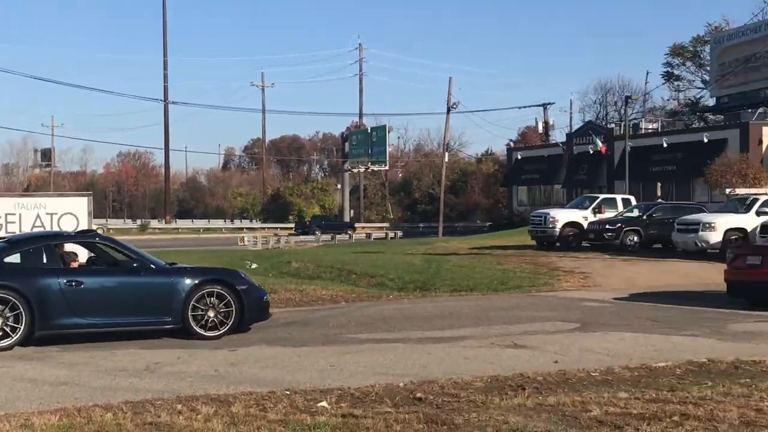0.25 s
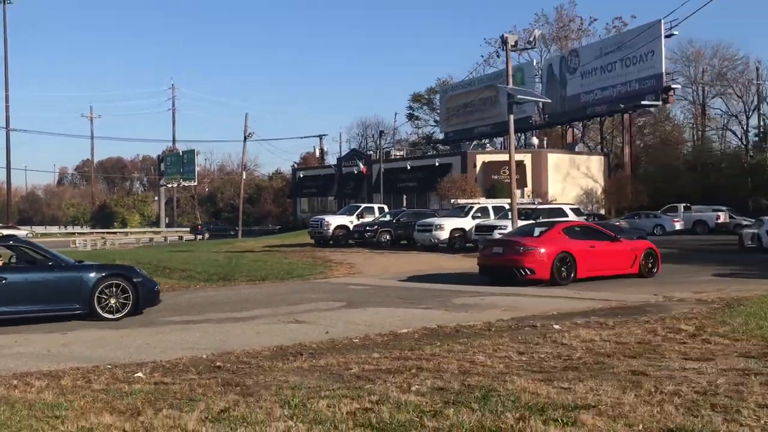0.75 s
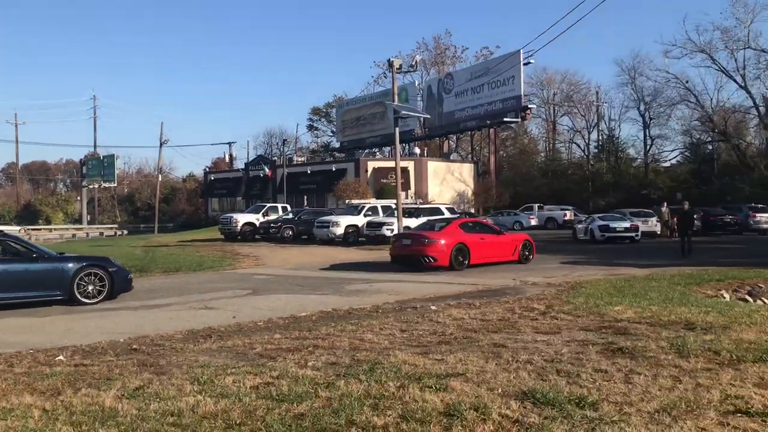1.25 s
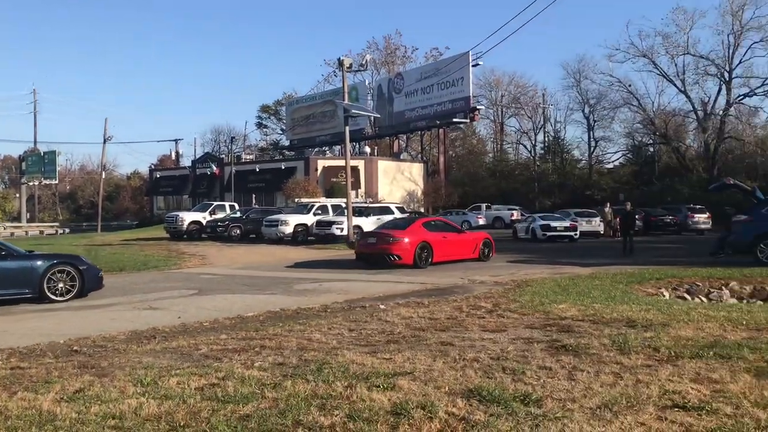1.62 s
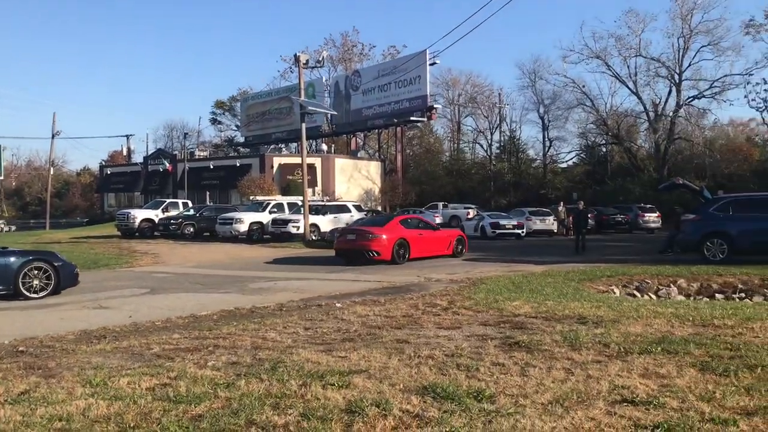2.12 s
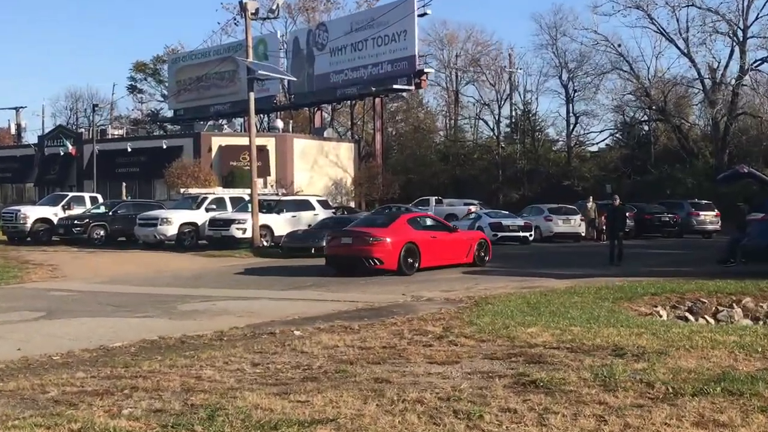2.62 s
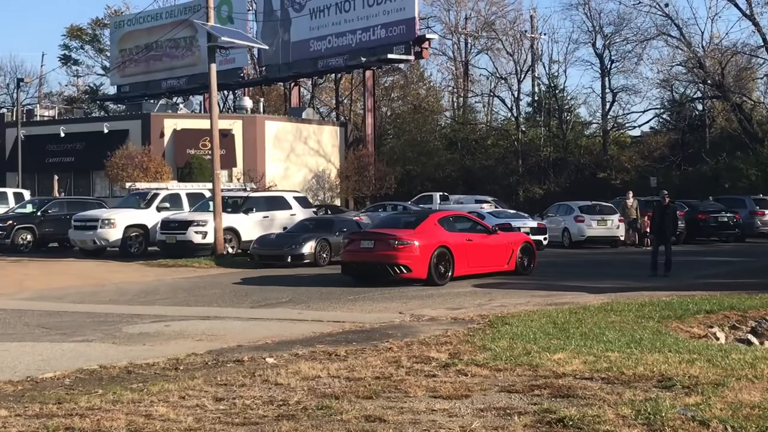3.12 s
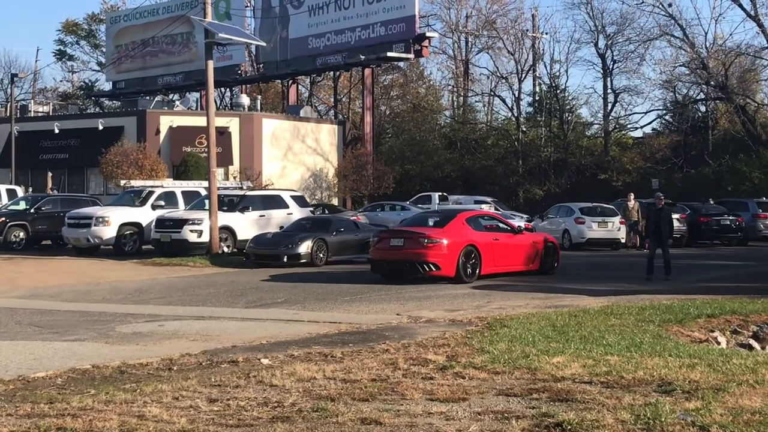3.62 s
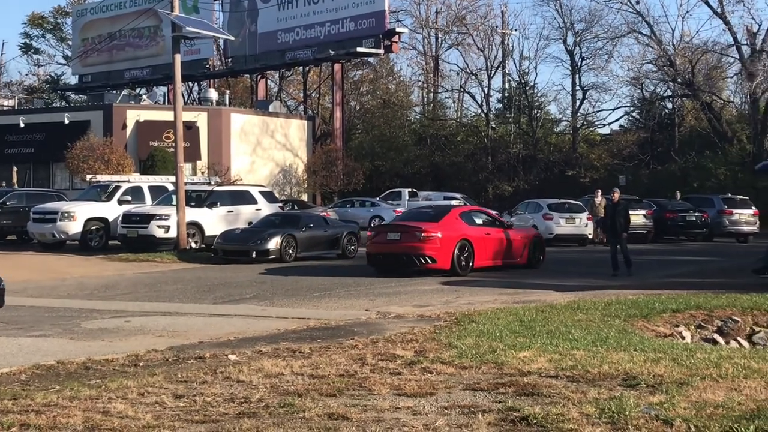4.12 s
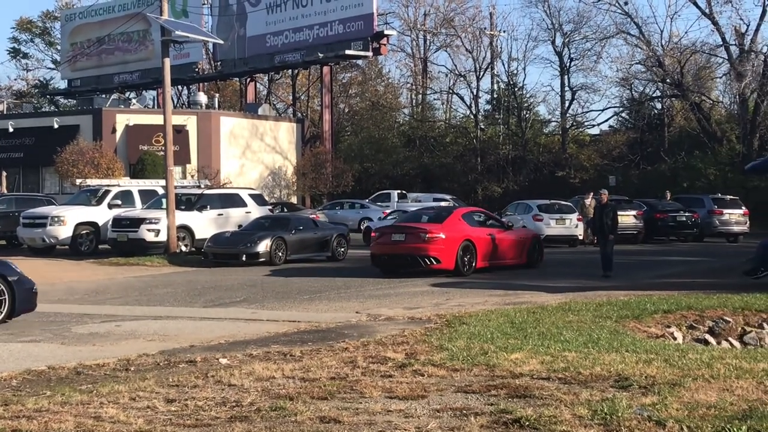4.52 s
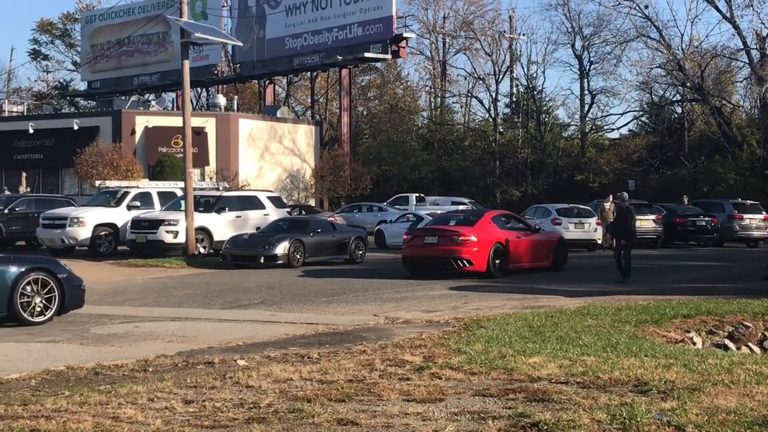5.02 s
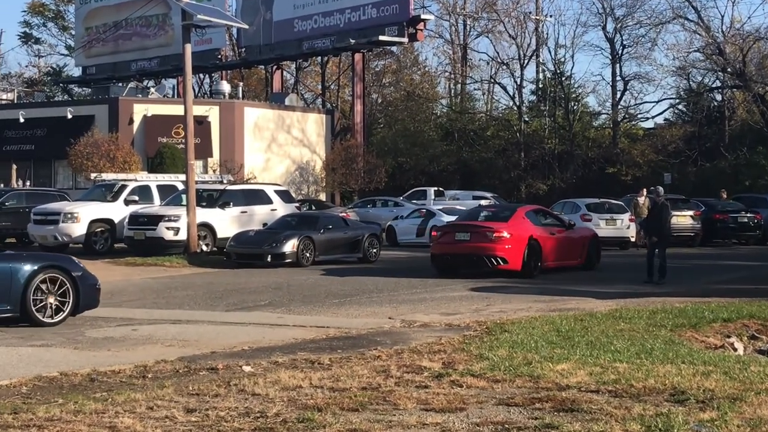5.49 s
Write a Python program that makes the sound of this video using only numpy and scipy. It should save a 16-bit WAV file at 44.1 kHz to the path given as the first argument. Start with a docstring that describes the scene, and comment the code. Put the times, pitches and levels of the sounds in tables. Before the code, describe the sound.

Several sports cars creep along with bassy, throbbing exhausts. Tread hiss dies quickly, one engine pulls harder and burbles, then the nearer one blips with a hum and thin metallic sizzle. Idling resumes with faint injector ticks, grit snaps and tiny squeaks, before another swell at the end. Open air by the grass, distant traffic, single-channel handheld sound with slightly thin sub-bass.

```python
"""A V8 coupe rolls away at little more than idle: firing pulses ring its tailpipes under a sine drone.
A nearer flat six idles lumpily behind it, with noise-burst injector ticks and an engine bay sizzle.
An exhaust booms under throttle, its third harmonic swelling as the pitch nears a muffler resonance.
Filtered noise makes nearby tyres, highway roar, and belt and fan whir; grit snaps and faint squeaks sound.
The sports cars creep along a road into a parking lot, heard from the grass verge."""
import sys
import numpy as np
from scipy import signal
from scipy.fft import rfft, irfft
from scipy.io import wavfile
from scipy.ndimage import uniform_filter1d

SR = 44100
rng = np.random.default_rng(int(sys.argv[2]) if len(sys.argv) > 2 else 0)


def digitize_waveform(pressure):
    """Quantize a signal to 16-bit integers and store it at the path in sys.argv[1].

    Rows of a 2-D input are taken as channels; values are limited to [-1, 1].
    """
    field = np.atleast_2d(pressure).T
    bounded = np.clip(field, -1, 1)
    quanta = np.round(bounded * 32767).astype(np.int16)
    wavfile.write(sys.argv[1], SR, quanta)


N = 253575
TIME = np.arange(N) / SR  # s

# V8 speed: (time [s], rate [firings/s])
V8_SPEED = [(0, 46), (1.2, 45.9), (1.55, 47.3), (1.69, 58), (2, 62.5), (2.3, 61.2), (2.6, 58.3), (3.05, 51),
            (3.7, 47.5), (4.25, 47.4), (4.6, 45.8), (5.53, 46.3), (5.72, 55)]
# V8 firing strengths over one engine cycle, scaled by the lope: (relative strength [dB])
V8_CYLINDERS = [2, -3, -3, -22.5, -2, 9.5, 2, -22.5]
# V8 tailpipe resonances: (frequency [Hz], width [Hz], relative gain [dB])
V8_PIPE = [(157, 72, -11), (236.6, 13.4, 1), (288.8, 16.4, 2), (290, 75, -9.5)]
# V8 exhaust resonances swelling one harmonic: (centre [Hz], width [Hz], top level [dB rms])
V8_LOW_RESONANCE = (58.87, 14.9, -25.5)
V8_HIGH_RESONANCE = (97.5, 8.5, -32.5)
# V8 burble at its lowest speed, slowly sinking, then recovering: (time [s], level [dB])
V8_BURBLE = [(0, -40.5), (1.5, -42), (3.2, -42.5), (4.35, -45.5), (5.75, -41.5)]
# V8 tailpipes singing briefly on the sixth harmonic: (start [s], end [s], level [dB])
V8_RING = [(4.3, 4.72, -45)]
# Weak echoes from parked cars and a wall: (delay [s], gain [dB])
CAR_PARK_ECHOES = [(.019, -11), (.047, -12.5), (.083, -12.5)]

# Flat six speed: (time [s], rate [firings/s])
SIX_SPEED = [(0, 46), (1.7, 45), (2.2, 42.6), (2.5, 44), (2.68, 55.5), (3.25, 43.4), (4.6, 47.2), (5.3, 42),
             (5.75, 44)]
# Flat six firing strengths over one engine cycle: (relative strength [dB])
SIX_CYLINDERS = [9, 6.5, 9.5, 6, 7.5, -19]
# Flat six tailpipe resonances: (frequency [Hz], width [Hz], relative gain [dB])
SIX_PIPE = [(41.7, 12.3, -5.5), (59.4, 17.5, 1.5), (86, 24, 0), (150.3, 37.2, -7), (260, 70, -15.5)]
# Flat six exhaust rumble: (time [s], level [dB])
SIX_RUMBLE = [(0, -31), (1.3, -32), (1.7, -40), (2.3, -33.5), (3.2, -32), (4.2, -32), (4.7, -33.5),
              (5.3, -33.5)]
# Flat six hum swelling after its blip and again near the end, added to its idle:
# (start [s], end [s], level [dB])
HUM_SWELLS = [(2.82, 3.25, -29.5), (5.3, 5.4, -34.5)]
# Engine bay sizzle surging after the flat six's blip and later, added to its idle:
# (start [s], end [s], level [dB])
SIZZLE_SURGES = [(2.9, 3.52, -59.5), (4.1, 4.75, -71), (5.7, 5.75, -62.5)]
# Engine bay sizzle spectrum: (frequency [Hz], relative density [dB/Hz])
SIZZLE_SPECTRUM = [(3200, -17), (3800, -1), (4100, -24), (4950, -30), (5250, 1), (5650, -20.5), (7100, -13),
                   (7700, -15), (8400, -8.5), (9100, -0.5), (9600, -19.5), (12000, -20), (15500, -26)]
# Injector tick strengths over one engine cycle: (relative strength [dB])
INJECTOR_STRENGTHS = [10.5, -14, 10, -11, 11.5, 5.5]
# Fuel rail modes: (frequency [Hz], width [Hz], relative level [dB])
FUEL_RAIL_MODES = [(3940, 340, -2), (7190, 180, -5.5), (8270, 280, -2), (8520, 35, -8.5), (9500, 450, -12),
                   (11900, 1400, -15)]

# Exhaust boom pitch, a third harmonic: (time [s], pitch [Hz])
BOOM_PITCH = [(0, 136), (0.14, 135), (0.28, 117), (0.54, 121), (0.72, 115.5), (1.2, 109.5), (2.47, 109),
              (2.68, 122.5), (3, 120), (3.45, 109), (5.1, 108.5), (5.21, 124), (5.35, 126), (5.55, 134),
              (5.75, 137)]
# Muffler resonance of the boom: (centre [Hz], width [Hz], top level before fading [dB rms])
BOOM_RESONANCE = (127.3, 19.94, -20.5)

# Tread hiss spectrum: (frequency [Hz], relative density [dB/Hz])
TREAD_SPECTRUM = [(800, -4.0), (1050, -0.5), (1500, -7.5), (2000, -6.0), (3000, -15.0), (6500, -24)]
# Air pumped through the nearest tyres' grooves: (start [s], end [s], level [dB])
GROOVE_SONG = [(0.3, 1.2, -46)]
# Grit snapping under tyres: (time [s], peak [dB], pitch [Hz], width of each resonance pass [Hz])
GRIT = [(1.7594, -31, 2200, 2500), (3.663, -40, 5000, 3800), (3.8035, -40.5, 5900, 1400),
        (3.8225, -44, 4900, 2200), (5.43, -49, 11000, 2620), (5.4446, -54, 11800, 2600)]
# Faint, distant squeaks: (time [s], level at centre [dB rms], pitch [Hz])
SQUEAKS = [(2.301, -54, 3380), (2.335, -56, 3650), (2.797, -53, 3520), (4.1, -57, 4350)]
# Highway roar spectrum: (frequency [Hz], relative density [dB/Hz])
ROAR_SPECTRUM = [(190, -54), (330, 1.5), (427, -6.5), (524, -10), (624, -6), (730, -7), (903, -3.5),
                 (1050, -6.5), (1500, -14), (2000, -16.5), (3000, -27.5), (3900, -56), (6600, -120)]
# Belt and fan whir spectrum: (frequency [Hz], relative density [dB/Hz])
WHIR_SPECTRUM = [(1290, -26), (2200, -25), (2490, 0), (2950, -2.5), (3560, 1.5), (4740, -2.5), (5100, -4),
                 (7070, -6.5), (7610, -8.5), (8400, -9), (10500, -17.5), (11700, -17), (14500, -20.5),
                 (15500, -21.5)]

V8_LOAD_FIRINGS_PER_S = 57.4  # the V8 pulls hard above this
BURBLE_DB_PER_FIRING_PER_S = 0.4241
RESONANCE_SKIRT_POWER = 5.85  # steepness outside an exhaust resonance
HUM_IDLE_DB, SIZZLE_IDLE_DB = -41.5, -73
BOOM_FADE_DB_PER_S = 0.92  # the booming car moves off
ROAR_START_DB, ROAR_FADE_DB_PER_S = -44.5, 0.2
WHIR_START_DB, WHIR_FADE_DB_PER_S = -55, 0.46
SQUEAK_HALF_S = 0.0068  # centre to 1/e
MIC_TOP_HZ = 15600


def v8_coupe():
    """Firing harmonics swell in exhaust resonances, under a burble that lopes harder as the engine pulls."""
    rate, = in_time(V8_SPEED)
    phase = np.cumsum(rate * (1 + .004 * drift(8))) / SR  # in firings
    pull = np.maximum(rate - V8_LOAD_FIRINGS_PER_S, 0)
    return v8_drone(rate, phase) + v8_burble(rate, phase, pull)


def v8_drone(rate, phase):
    """Sines at firing harmonics 1, 2, 3 and 6; the first two follow the exhaust resonances."""
    first_db = resonance_db(rate, V8_LOW_RESONANCE)
    second_db = resonance_db(2 * rate, V8_HIGH_RESONANCE)
    first = tone(phase, first_db + .7 * drift(10))
    second = tone(2 * phase, second_db + 1.6 * drift(10))
    third = tone(3 * phase, .5 * first_db - 32 + 4.8 * drift(16))
    ring_gain = swells(V8_RING, rise_db_per_s=15, fall_db_per_s=25)
    sixth = ring_gain * tone(6 * phase, 3 * drift(12))
    return first + second + third + sixth


def v8_burble(rate, phase, pull):
    """Uneven firing pulses ring the tailpipes and echo off the car park."""
    lope = 0.41 + .07 * pull
    # the banks' pulses reach the tailpipes unevenly spaced, filling in between harmonics
    bank_sway = np.sin(np.pi * phase / 2) + np.sin(np.pi * phase * 3 / 4)
    stagger = .045 * lope * bank_sway + .012 * drift(25)
    clicks = firings(phase + stagger, V8_CYLINDERS, uneven_db=1.0, lope=lope)
    burble = car_park(exhaust(clicks, V8_PIPE, turbulence=.45, muffler_hz=385))
    level_db = in_time(V8_BURBLE)[0] + BURBLE_DB_PER_FIRING_PER_S * (rate - rate.min())
    # throb once per crank turn, i.e. every fourth firing
    throb_db = .2 * pull * np.cos(np.pi * (phase - 2) / 2)
    return from_db(level_db + throb_db) * burble


def car_park(x):
    """Parked cars and a wall add delayed, weaker copies."""
    echoes = sum(from_db(db) * np.interp(TIME - delay_s, TIME, x, left=0)
                 for delay_s, db in CAR_PARK_ECHOES)
    return x + echoes


def flat_six():
    """Uneven firing pulses give a lumpy idle, with one bank's hum, ticking injectors and bay sizzle."""
    rate, = in_time(SIX_SPEED)
    rumble_db, = in_time(SIX_RUMBLE)
    phase = np.cumsum(rate * (1 + 0.01146 * drift(6.38))) / SR  # in firings
    clicks = firings(phase + .025 * drift(20), SIX_CYLINDERS, uneven_db=1.6)
    rumble = exhaust(clicks, SIX_PIPE, turbulence=.3, muffler_hz=360)

    hum_gain = from_db(HUM_IDLE_DB) + swells(HUM_SWELLS, rise_db_per_s=86, fall_db_per_s=18)
    # third harmonic of one bank, which has half the firings
    hum = tone(phase * 3 / 2, 20 * np.log10(hum_gain))

    sizzle_gain = from_db(SIZZLE_IDLE_DB) + swells(SIZZLE_SURGES, rise_db_per_s=74, fall_db_per_s=55)
    sizzle_db = 20 * np.log10(sizzle_gain)
    throb_db = 1.8 * np.sin(np.pi * phase) + 1.6 * np.sin(2 * np.pi * phase)
    sizzle = from_db(sizzle_db + throb_db + 1.7 * drift(60)) * coloured_noise(SIZZLE_SPECTRUM)
    # ticks follow the sizzle's surges, weakly
    ticking = from_db(0.29 * sizzle_db - 44.5) * injectors(phase)
    return from_db(rumble_db) * rumble + hum + sizzle + ticking


def injectors(phase):
    """Each tick's noise burst excites every fuel rail mode with a strength of its own; rms 1."""
    out = np.zeros(N)
    for hz, width_hz, db in FUEL_RAIL_MODES:
        clicks = firings(phase, INJECTOR_STRENGTHS, uneven_db=1.9)
        envelope = cut(puffs(clicks, decay_s=.010), 170, "low")
        mode = resonate(envelope * rng.standard_normal(N), hz, width_hz)
        out += from_db(db) * rms_one(mode)
    return rms_one(out)


def boom():
    """A slow engine's third harmonic swells in the muffler under throttle; its neighbours stay faint."""
    third_hz, = in_time(BOOM_PITCH)
    phase = np.cumsum(third_hz) / SR / 3  # cycles of the fundamental
    level_db = resonance_db(third_hz, BOOM_RESONANCE) - BOOM_FADE_DB_PER_S * TIME
    third = tone(3 * phase, level_db + 1.8 * drift(36))
    # neighbours swell less, and fade with distance
    faint_db = 0.25 * level_db - 2.8 * TIME + 0.96 * drift(3.3)
    second = tone(2 * phase, faint_db - 38.0)
    fifth = tone(5 * phase, faint_db - 33.5)
    sixth = tone(6 * phase, faint_db - 43.5)
    return third + second + fifth + sixth


def near_tyres():
    """Tread hiss dies as the closest car slows to a crawl; air in the grooves sings a little longer."""
    hiss = from_db(-43.5 - 9.6 * TIME) * coloured_noise(TREAD_SPECTRUM)
    groove_gain = swells(GROOVE_SONG, rise_db_per_s=11, fall_db_per_s=12)
    groove_air = rms_one(resonate(coloured_noise(ROAR_SPECTRUM), hz=1087, width_hz=280))
    return hiss + groove_gain * groove_air


def grit():
    """Each pinched stone gives one dry snap: a decaying noise burst, resonated twice."""
    out = np.zeros(N)
    for start_s, peak_db, hz, width_hz in GRIT:
        decay = (TIME >= start_s) * np.exp(-np.abs(TIME - start_s) / .0016)
        burst = rng.standard_normal(N) * decay
        snap = resonate(resonate(burst + 1e-18, hz, width_hz), hz, width_hz)
        out += from_db(peak_db) * snap / np.abs(snap).max()
    return out


def squeaks():
    """Short sine blips with soft Gaussian edges."""
    return sum(tone(hz * TIME, db) * np.exp(-((TIME - centre_s) / SQUEAK_HALF_S) ** 2)
               for centre_s, db, hz in SQUEAKS)


def road():
    """Highway tyre roar, and belt and fan whir: coloured noises, wavering and receding."""
    roar_db = ROAR_START_DB - ROAR_FADE_DB_PER_S * TIME + 0.17 * drift(22)
    whir_db = WHIR_START_DB - WHIR_FADE_DB_PER_S * TIME + 0.86 * drift(23)
    roar = from_db(roar_db) * coloured_noise(ROAR_SPECTRUM)
    whir = from_db(whir_db) * coloured_noise(WHIR_SPECTRUM)
    return roar + whir


def firings(phase, cylinders_db, uneven_db, lope=1):
    """One click per whole cycle of phase; strength from the cylinder (scaled by lope) and chance."""
    at = np.flatnonzero(np.diff(np.floor(phase)) > 0)
    pattern_db = np.resize(cylinders_db, len(at)) * np.broadcast_to(lope, N)[at]
    clicks = np.zeros(N)
    clicks[at] = from_db(pattern_db + uneven_db * rng.standard_normal(len(at)))
    return clicks + 1e-18


def puffs(clicks, decay_s):
    """Envelope that jumps at each click and dies away exponentially; rms 1."""
    return rms_one(signal.lfilter([1], [1, -np.exp(-1 / (decay_s * SR))], clicks))


def exhaust(clicks, pipe, turbulence, muffler_hz):
    """Pressure pulses and turbulent puffs ring the pipe and pass the muffler; running rms 1."""
    turbulent = puffs(clicks, decay_s=0.0055) * rng.standard_normal(N)
    gas = rms_one(clicks) + turbulence * turbulent
    # alternate polarity between resonances
    rung = sum((-1) ** k * from_db(db) * resonate(gas, hz, width_hz)
               for k, (hz, width_hz, db) in enumerate(pipe))
    muffled = cut(rung, muffler_hz, "low", order=4)
    return muffled / np.sqrt(uniform_filter1d(muffled ** 2, size=SR // 3) + 1e-12)


def resonance_db(hz, resonance):
    """Level of a harmonic at this pitch in a flat-topped exhaust resonance."""
    centre_hz, width_hz, top_db = resonance
    offset = np.abs(2 * (hz - centre_hz) / width_hz)
    return top_db - 10 * np.log10(1 + offset ** RESONANCE_SKIRT_POWER)


def swells(rows, rise_db_per_s, fall_db_per_s):
    """Summed gain of events that rise to their level, hold from start to end, and die away."""
    gain = 0
    for start_s, end_s, db in rows:
        before_db = rise_db_per_s * np.maximum(start_s - TIME, 0)
        after_db = fall_db_per_s * np.maximum(TIME - end_s, 0)
        gain = gain + from_db(db - before_db - after_db)
    return gain


def tone(phase, level_db):
    """Sine at the given rms level; phase in cycles."""
    return from_db(level_db) * np.sqrt(2) * np.sin(2 * np.pi * phase)


def coloured_noise(spectrum):
    """Steady noise of the given spectrum, falling away beyond its ends; rms 1."""
    hz, db = np.transpose(spectrum)
    grid_hz = np.maximum(np.arange(N // 2 + 1) * SR / N, 1)
    gain = from_db(np.interp(np.log(grid_hz), np.log(hz), db))
    gain *= np.minimum(grid_hz / hz[0], 1) ** 2 * np.minimum(hz[-1] / grid_hz, 1) ** 2
    return rms_one(irfft(rfft(rng.standard_normal(N)) * gain, N))


def resonate(x, hz, width_hz):
    """Two-pole resonance with gain 1 on top."""
    r = np.exp(-np.pi * width_hz / SR)
    zeros = np.array([1, 0, -1]) * (1 - r * r) / 2
    poles = [1, -2 * r * np.cos(2 * np.pi * hz / SR), r * r]
    return signal.lfilter(zeros, poles, x)


def cut(x, hz, kind, order=2):
    """Butterworth filter."""
    return signal.sosfilt(signal.butter(order, hz, kind, fs=SR, output="sos"), x)


def drift(corner_hz):
    """Slow random wander of spread 1: noise through a double pole, drawn every 40 samples."""
    r = np.exp(-80 * np.pi * corner_hz / SR)
    noise = rng.standard_normal(N // 40 + 2002)
    slow = signal.lfilter([1], [1, -2 * r, r * r], noise)[2000:]  # drop the filter's settling
    return np.interp(np.arange(N) / 40, np.arange(len(slow)), rms_one(slow))


def in_time(rows):
    """Each column of a curve table, interpolated at every sample."""
    time_s, *columns = np.transpose(rows)
    return [np.interp(TIME, time_s, column) for column in columns]


def rms_one(x):
    """Scale to unit rms."""
    return x / np.sqrt(np.mean(x ** 2) + 1e-20)


def from_db(db):
    """Decibels to gain."""
    return 10 ** (np.asarray(db) / 20)


def scene():
    """All cars and the road summed in the open air, one channel."""
    cars = v8_coupe() + flat_six() + boom()
    background = near_tyres() + grit() + squeaks() + road()
    return (cars + background)[None]


def record(dry):
    """The small microphone loses the deepest bass; a steep filter cuts the top."""
    thin = cut(dry, 32.3, "high", order=8)
    top_cut = signal.ellip(10, .1, 80, MIC_TOP_HZ, fs=SR, output="sos")
    return signal.sosfilt(top_cut, thin)


dry = scene()
out = record(dry)
digitize_waveform(out)
```